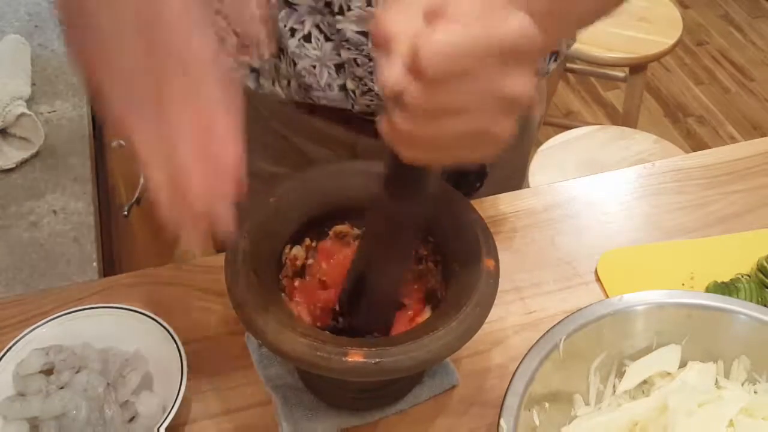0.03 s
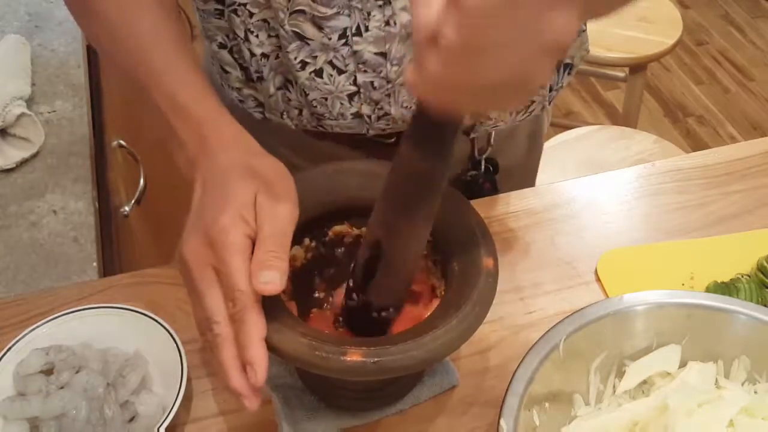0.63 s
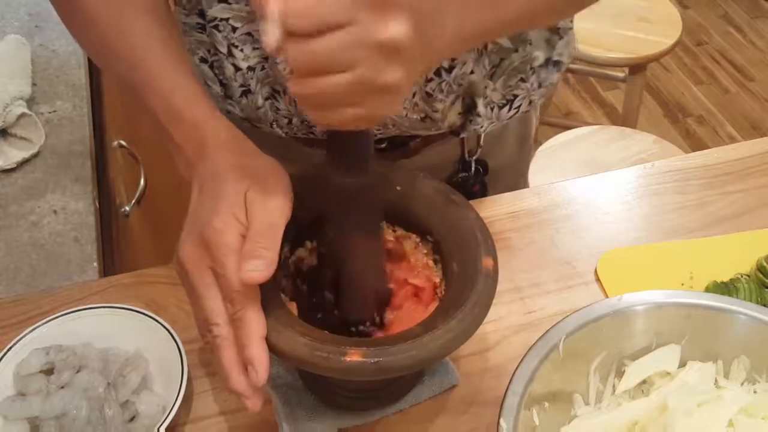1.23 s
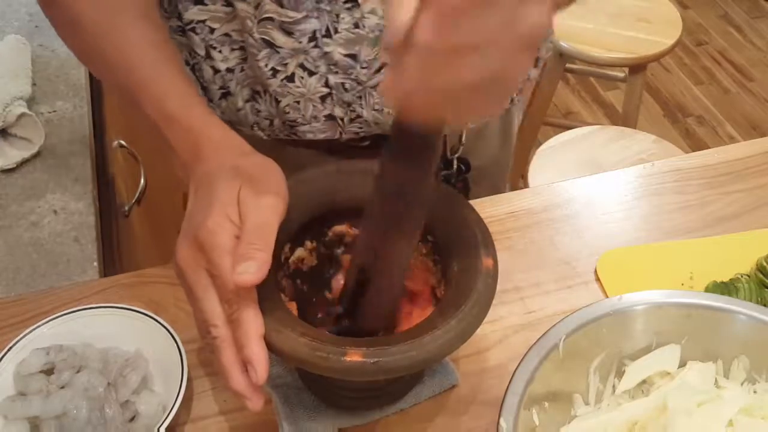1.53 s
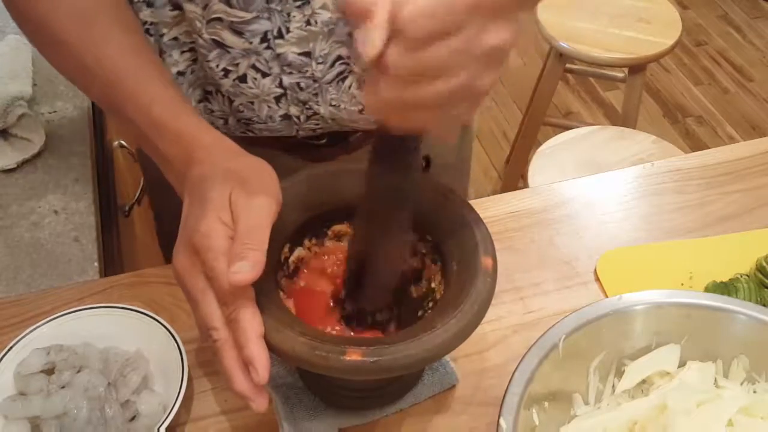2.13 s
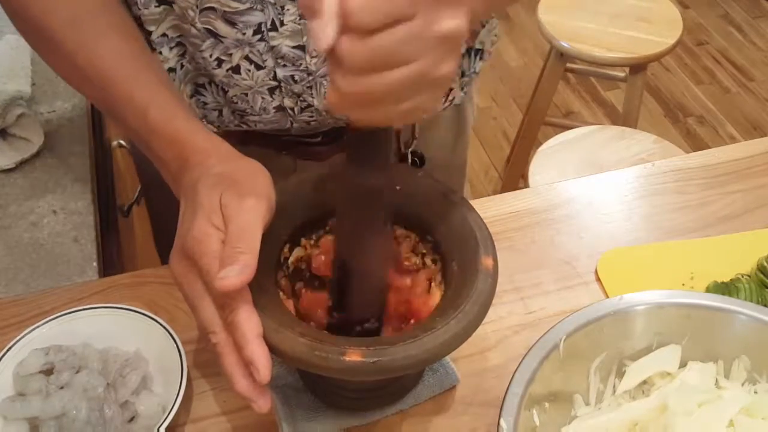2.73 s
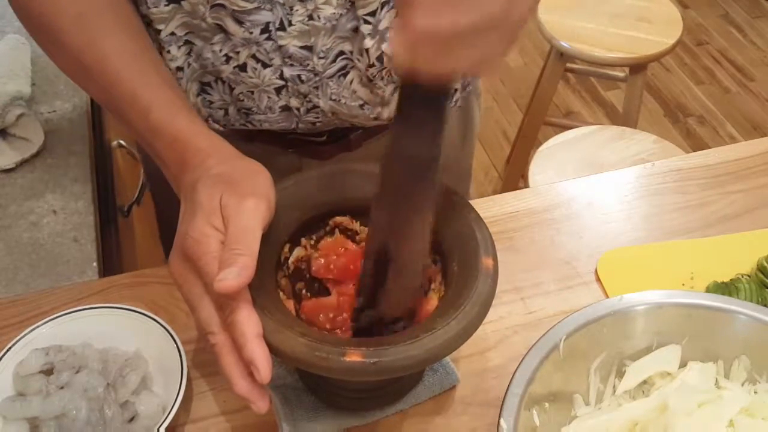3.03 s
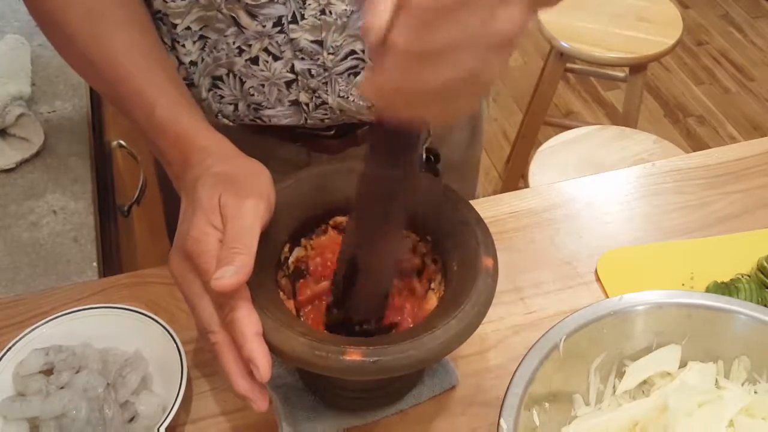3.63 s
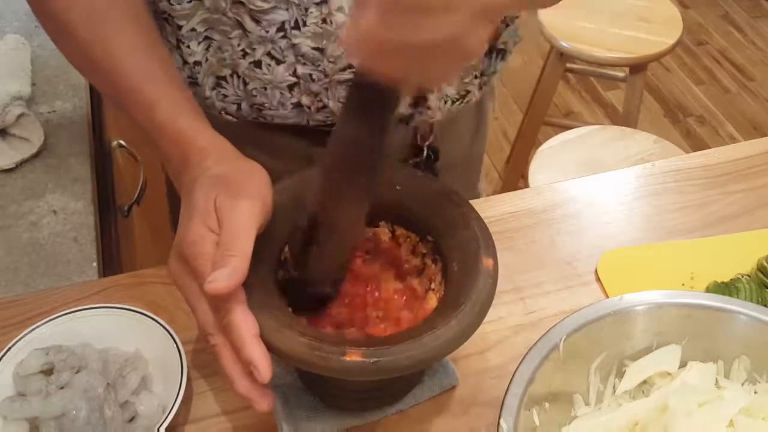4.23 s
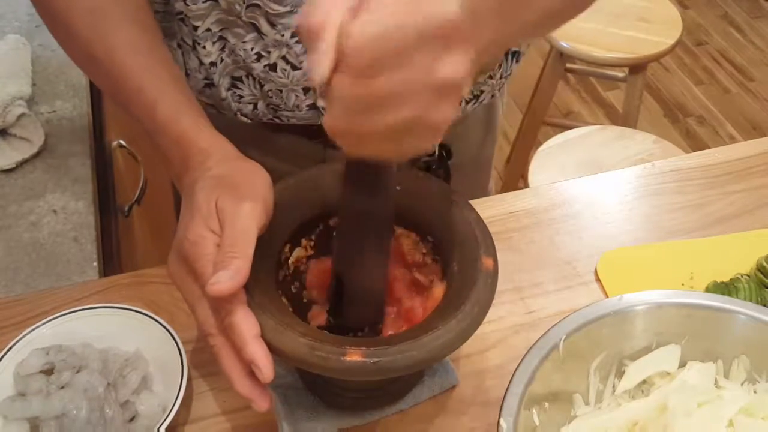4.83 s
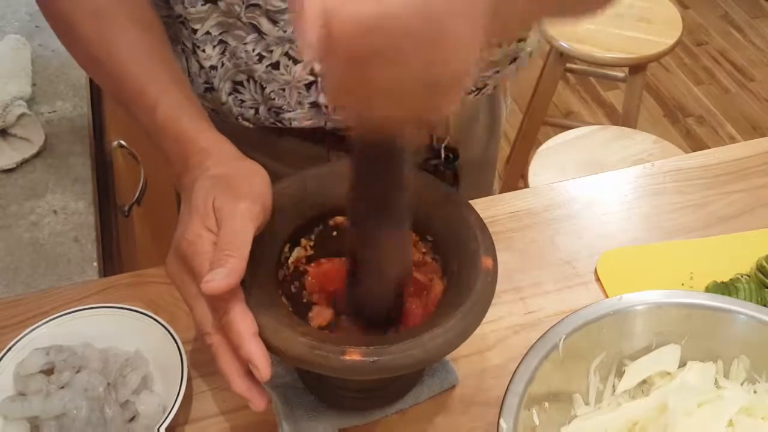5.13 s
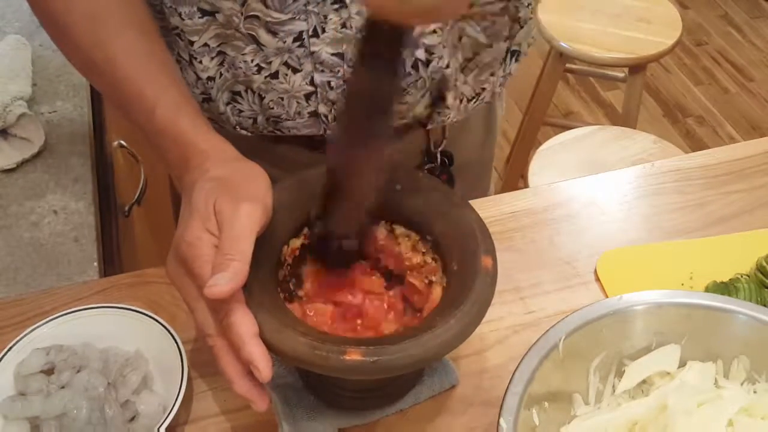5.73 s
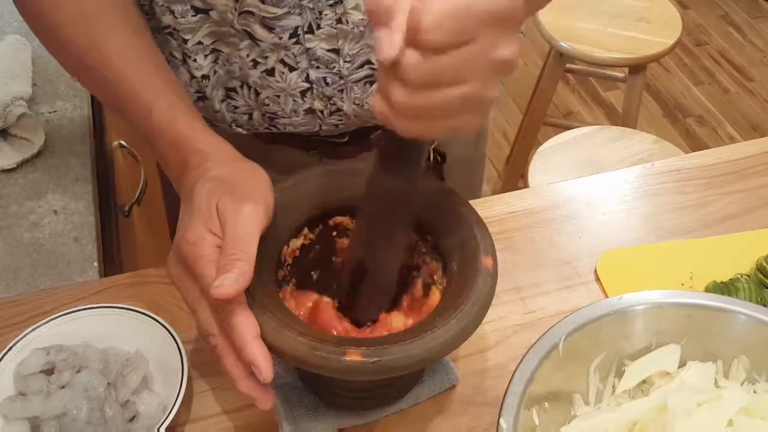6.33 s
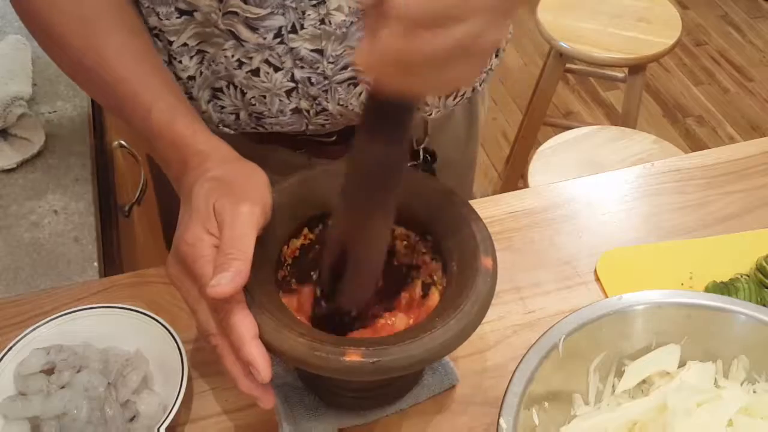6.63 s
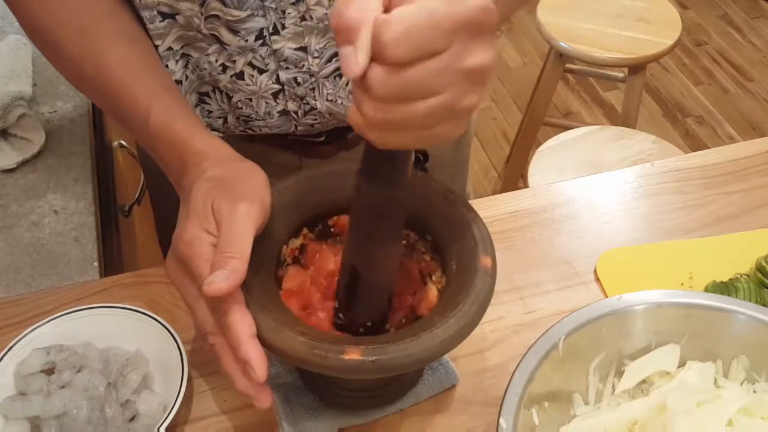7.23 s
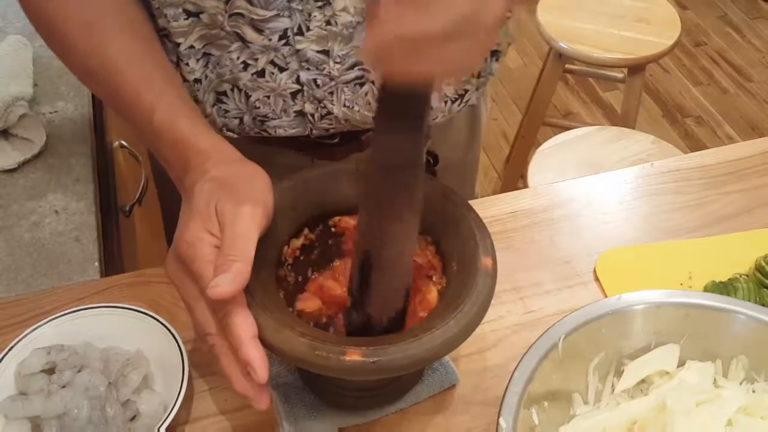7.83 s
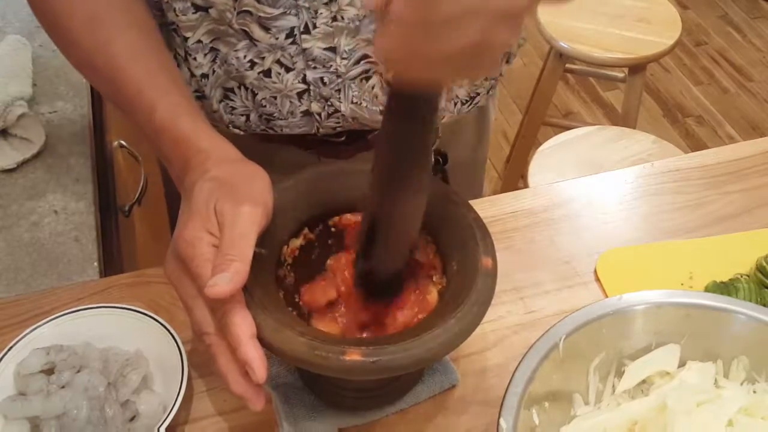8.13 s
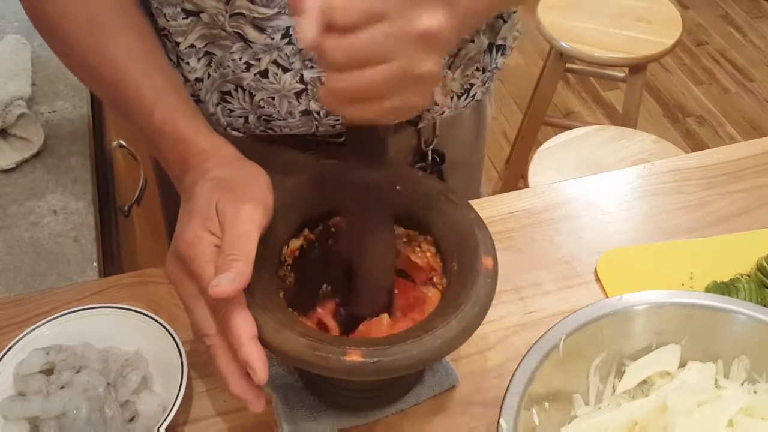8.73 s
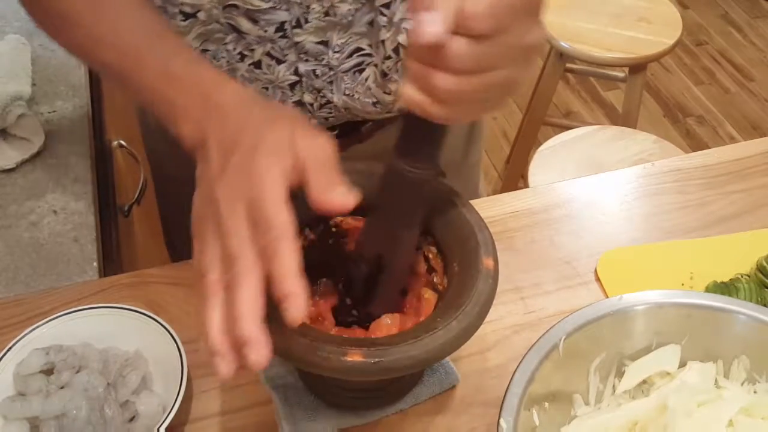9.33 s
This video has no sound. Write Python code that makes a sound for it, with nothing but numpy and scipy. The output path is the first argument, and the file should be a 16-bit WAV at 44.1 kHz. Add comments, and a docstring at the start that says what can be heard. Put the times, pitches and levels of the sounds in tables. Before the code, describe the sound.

A wooden pestle pounds wet tomato in a clay mortar, about two uneven strokes a second throughout. Each landing gives a hollow knock and a low thud through the counter, while the pulp squelches softly. Now and then the pestle clacks on the bare wall with a brief ring. The sound is close and slightly left, in a small kitchen with a faint appliance hum.

```python
"""A wooden pestle pounds wet tomato in a clay mortar on a kitchen counter, close to a stereo microphone.
Some strokes clack on the bare wall and set it ringing; each landing knocks the bowl's hollow and thuds
through the counter. The pulp squelches with trapped air and juice as the pestle enters and leaves.
The mortar stands a little left. The small room answers briefly, and an appliance hums behind it all."""
import sys
import numpy as np
from scipy import signal
from scipy.fft import rfft, irfft, next_fast_len
from scipy.io import wavfile

SR = 44100
rng = np.random.default_rng(int(sys.argv[2]) if len(sys.argv) > 2 else 0)


def int16_out(signal):
    """Quantize to a 16-bit WAV file."""
    q = np.round(np.clip(np.atleast_2d(signal).T, -1, 1) * 32767)
    wavfile.write(sys.argv[1], SR, q.astype(np.int16))


N = 418950
T = np.arange(SR // 2) / SR  # time within one blow
GRAIN_T = np.arange(SR // 6) / SR  # time within one squelch

# pestle on the bare wall: start_s, clack_db, contact_hz, ring_db, ping_db, counter_db
WALL_HITS = [(0.001, -35.5, 1010, -55.5, -60, -55), (0.868, -11, 1250, -39.5, -54.5, -37.5),
             (3.138, -19, 840, -49, -43, -53), (4.909, -18.5, 1050, -52, -52, -36.5),
             (5.882, -6.5, 1510, -27.5, -20.5, -40.5), (5.9646, -14.5, 1250, -56, -46, -35.5),
             (6.299, -9.5, 850, -31, -36, -42.5), (7.954, -11, 925, -38, -32.5, -42.5),
             (8.729, -16, 1115, -40, -49.5, -43)]
# pestle pressing through the pulp and landing: land_s, press_s, pulp_db, knock_db, bounce_db, counter_db
LANDINGS = [(0.002, 0.0018, -54, -41, -46.5, -49.5), (0.471, .04, -59, -41.5, -63, -71),
            (0.934, 0.06, -49, -25, -41.5, -38), (1.265, .005, -53, -44.5, -41.5, -43),
            (1.324, 0.037, -51, -25, -40, -49), (1.346, .02, -44, -26, -38.5, -34),
            (1.744, 0.043, -58, -20, -45, -34.5), (1.762, 0.017, -45.5, -19.5, -43, -45),
            (2.149, 0.077, -54.5, -45.5, -56.5, -65), (2.512, 0.08, -48.5, -30, -40.5, -40),
            (2.85, .04, -55, -47, -60, -64), (3.195, 0.0065, -57.5, -29.5, -45.5, -42),
            (3.236, .03, -55.5, -33.5, -36, -42), (3.262, 0.024, -55, -33, -45, -41.5),
            (3.827, 0.014, -48, -26.5, -42.5, -45.5), (4.138, 0.082, -61.5, -53, -55.5, -65),
            (4.378, .005, -86, -55, -41, -47), (4.46, 0.063, -51, -29.5, -43.5, -44),
            (4.934, 0.018, -46, -33.5, -46, -47), (4.981, 0.035, -50.5, -26, -45, -42),
            (5.492, 0.052, -55, -39.5, -44.5, -49), (6.008, 0.048, -52.5, -20, -39, -38),
            (6.02, 0.012, -52, -25, -67.5, -59), (6.413, 0.042, -46.5, -33.5, -46, -51),
            (6.448, 0.022, -47.5, -27.5, -49, -45.5), (6.843, 0.052, -59.5, -26.5, -40.5, -42.5),
            (7.29, .075, -53.5, -10.5, -39, -31.5), (7.679, .075, -50.5, -36, -40.5, -39.5),
            (8.045, .055, -44.5, -18, -37.5, -36.5), (8.46, .05, -68, -65, -79, -80),
            (8.779, .01, -53, -37, -47, -57), (8.84, 0.059, -51, -27, -48.5, -44),
            (9.19, 0.052, -57.5, -56, -42.5, -75.5), (9.464, 0.03, -56, -39, -50, -56)]


def amp(db):
    """dB to gain."""
    return 10 ** (np.asarray(db) / 20)


def unit(x):
    """Scale to rms 1."""
    return x / np.sqrt(np.mean(x ** 2) + 1e-20)


def unit_onset(x, seconds):
    """Scale to rms 1 over the first moments."""
    return x / np.sqrt(np.mean(x[:int(seconds * SR) + 1] ** 2) + 1e-20)


def unit_peak(x):
    """Scale to peak 1."""
    return x / (np.abs(x).max() + 1e-20)


def along(points, hz):
    """Read (frequency_hz, value) points on a log axis."""
    f, v = np.transpose(points)
    return np.interp(np.log(hz + 1), np.log(f), v)


def filtered(x, response):
    """Pass x through a complex frequency response."""
    n = x.shape[-1]
    m = next_fast_len(n + SR // 16, real=True)
    return irfft(rfft(x, m) * response(np.fft.rfftfreq(m, 1 / SR)), m)[..., :n]


def resonances(table, f):
    """Response of (pitch_hz, width_hz, level_db) resonances; neighbours swing in opposite senses."""
    return sum((-1) ** k * amp(db) * 1j * f * width / (hz * hz - f * f + 1j * f * width)
               for k, (hz, width, db) in enumerate(table))


def add(track, start_s, sound):
    """Mix a sound into the track."""
    start = max(round(start_s * SR), 0)
    track[start:start + len(sound)] += sound[:N - start]


def widen(pair, likeness):
    """Two unrelated noises become left and right with the given correlation."""
    turn = lambda f: np.arccos(np.clip(along(likeness, f), -1, 1)) / 2
    mid, side = filtered(pair, lambda f: np.array([np.cos(turn(f)), np.sin(turn(f))]))
    return np.array([mid + side, mid - side])


def background(air_db=-63, hum_db=-64.5):
    """Still room air and the narrow drones of an appliance."""
    air_spectrum = [(20, -21.5), (31, -29), (50, 0), (64, -4), (100, -2.5), (170, -8.5), (340, -5),
                    (500, -9.5), (1000, -13.5), (1900, -13), (2500, -20), (4000, -23), (8000, -28.5),
                    (15500, -34.5)]  # room tone: frequency_hz, density_db
    likeness = [(60, 0.63), (180, 0.99), (550, 0.66), (1650, 0.12), (4970, -0.18), (15000, 0.19)]  # left against right: frequency_hz, correlation
    drones = [(118, 7.5, -2.5), (321.3, 3.3, -1), (365.5, 48, -12), (430, 33, -19.5), (790, 6.8, -25),
              (1250, 43, -24)]  # appliance hum: pitch_hz, width_hz, level_db
    air, hum = (widen(rng.standard_normal((2, N)), likeness) for _ in range(2))
    air = unit(filtered(air, lambda f: amp(along(air_spectrum, f))))
    hum = unit(filtered(hum, lambda f: resonances(drones, f)))
    return amp(air_db) * air + amp(hum_db) * hum


def kitchen(x, gap_s=0.0029, build_s=0.02):
    """The room answers after a short gap; each frequency dies at its own speed."""
    decay = [(100, 0.32), (500, 0.28), (1400, 0.41), (4000, 0.48), (9000, 0.288), (15000, 0.6)]  # reverberation time: frequency_hz, t60_s
    tone = [(80, 6), (300, 9.5), (750, -0.5), (1400, -1), (3000, -1), (8000, 3), (15000, -5)]  # colour of the tail: frequency_hz, level_db
    likeness = [(100, 0.96), (400, 0.91), (1000, 0.056), (8000, 0)]  # left against right: frequency_hz, correlation
    hz, t, noise = signal.stft(rng.standard_normal((2, len(T))), SR, nperseg=256)
    fading = noise * amp(-60 * t / along(decay, hz)[:, None])
    tail = signal.istft(fading, SR, nperseg=256)[1][:, :len(T)]
    tail = filtered(widen(tail, likeness), lambda f: amp(along(tone, f)))
    tail *= np.clip((T - gap_s) / build_s, 0, 1)
    return signal.fftconvolve(x[None], tail / np.linalg.norm(tail[0]), axes=1)[:, :N]


def reflections(x, dull_hz=5000):
    """Close surfaces send back slightly dulled copies, at different times on each side."""
    echoes = [(.0014, 0.00062, -20.5), (.0025, 0.0041, -14.5), (.0056, .0052, -14), (.0086, 0.012, -11),
              (.0141, 0.017, -22), (.0212, 0.032, -16)]  # counter, dishes, cupboards, ceiling: left_delay_s, right_delay_s, level_db
    copies = lambda f: sum(amp(db) * np.exp(-2j * np.pi * f * np.array([[left], [right]]))
                           for left, right, db in echoes)
    return filtered(x, lambda f: copies(f) / (1 + (f / dull_hz) ** 2))


def from_left(x, lead_s=0.000055, max_radians=1.745):
    """The left side of the microphone hears the sound sooner and mostly louder."""
    balance = [(70, 9.5), (150, 0), (300, 3), (650, -0.5), (1400, 6), (2500, 1), (5000, -2.5), (10000, 3.5)]  # left over right: frequency_hz, level_db
    side = np.array([[1], [-1]]) / 2
    phase = lambda f: np.minimum(2 * np.pi * f * lead_s, max_radians)
    return filtered(x, lambda f: amp(side * along(balance, f)) * np.exp(1j * side * phase(f)))


def bubbles(pitch_hz, spread_s, count=9, cycles=26, glide=0.19, scatter=0.18):
    """Air pockets pop one after another: short damped tones whose pitch rises."""
    wait, detune, size = rng.standard_normal((count, 3)).T[:, :, None]
    hz = pitch_hz * np.exp(scatter * detune)
    delay = (np.abs(wait) - np.abs(wait).min()) * spread_s
    t = np.maximum(GRAIN_T[:SR // 14] - delay, 0)
    age = t * hz / cycles  # 1 when a pop has fallen by 60 dB
    pops = amp(1.7 * size - 60 * age) * np.sin(2 * np.pi * hz * t * (1 + glide * np.minimum(age, 1)))
    return (pops * np.exp(-delay / spread_s)).sum(0)


def settling(count=45, level_db=-70, uneven_db=4.5, pitch_hz=2500):
    """The wet paste slides down the wall with faint pops at random moments."""
    track = np.zeros(N)
    for place, (size, detune) in zip(rng.random(count), rng.standard_normal((count, 2))):
        pops = bubbles(pitch_hz * np.exp(0.22 * detune), spread_s=0.0061)
        add(track, place * (N - 1) / SR, amp(level_db + uneven_db * size) * unit_onset(pops, 0.0087))
    return track


def crackle(spread_db, colour, burst_samples=30):
    """Tiny noise bursts of unequal size in the given colour, rms 1."""
    n = len(GRAIN_T)
    sizes = np.repeat(np.minimum(rng.standard_normal(n), 2.4), burst_samples)[:n]
    return unit(filtered(rng.standard_normal(n) * amp(spread_db * sizes), colour))


def squelch(flow, pitch_hz, smack_db, spray_db, hollow_db):
    """Pulp moves with the given flow: air pockets smack, spray fizzes and the bowl's hollow answers."""
    fizz = [(2000, -37), (3500, 0.5), (5500, 0.5), (8500, 3), (10500, -6.5), (12500, -1.5), (15500, -10.5)]  # spectrum of the spraying juice: frequency_hz, density_db
    pockets = [(1500, 450, -5), (pitch_hz, 0.22 * pitch_hz, 2),
               (1.42 * pitch_hz, 600, -5), (2 * pitch_hz, 700, -11)]
    smack = crackle(spread_db=8, colour=lambda f: resonances(pockets, f) * f / np.hypot(f, 1200))
    spray = crackle(spread_db=8.5, colour=lambda f: amp(along(fizz, f)))
    hollow = crackle(spread_db=-1, colour=lambda f: resonances([(827, 240, 0)], f) ** 2)
    layers = [(smack_db, smack), (spray_db, spray), (hollow_db, hollow)]
    return np.sqrt(np.mean(flow ** 2)) * sum(amp(db) * unit(flow * grains) for db, grains in layers)


def squirts(burst_s=0.0055, ooze_db=-26, ooze_s=0.032):
    """Air and juice burst out, or are sucked in as the pestle lifts; bubbles pop and a little oozes."""
    bursts = [(0.078, -59, 2500, -80), (0.434, -63, 3500, -47.5), (0.471, -50, 2120, -73),
              (0.482, -49, 2100, -70), (0.742, -56.5, 1820, -81), (1.124, -45, 2080, -65),
              (1.325, -41.5, 1844, -47), (1.359, -37.5, 3120, -58.5), (1.653, -49, 1924, -62),
              (1.697, -56.5, 2780, -54), (2.149, -47.5, 2730, -72), (2.449, -54, 3880, -52.5),
              (2.495, -55, 2500, -54.5), (2.811, -62, 3200, -53.5), (2.844, -55, 3190, -68),
              (3.285, -51, 1970, -50), (3.826, -38, 2300, -48), (3.831, -41, 4600, -66),
              (4.373, -53.5, 2600, -55.5), (4.444, -51.5, 1890, -55), (4.656, -59.5, 2850, -69),
              (4.933, -39.5, 3150, -44.5), (4.97, -44.5, 2420, -48), (5.373, -61.5, 3070, -62),
              (5.963, -38, 3050, -72), (6.001, -46.5, 2700, -60), (6.43, -39.5, 2270, -36),
              (6.823, -44.5, 2430, -48), (6.972, -59, 1700, -81.5), (7.208, -61, 2920, -51.5),
              (7.25, -47.5, 2500, -55), (7.321, -50.5, 1930, -76.5), (7.606, -50, 1850, -55),
              (8.013, -48.5, 1950, -57.5), (8.046, -40.5, 2790, -55), (8.806, -68, 2300, -46.5),
              (9.146, -50.5, 2200, -44.5), (9.165, -40, 2420, -39.5), (9.426, -36.5, 2150, -49.5)]  # sudden squirts in the pulp: start_s, level_db, pocket_hz, spray_db
    track = np.zeros(N)
    flow = unit_onset(np.exp(-GRAIN_T / burst_s) + amp(ooze_db) * np.exp(-GRAIN_T / ooze_s), 0.01)
    for start_s, db, pitch_hz, spray_db in bursts:
        add(track, start_s, squelch(flow, pitch_hz, smack_db=db - 2, spray_db=spray_db, hollow_db=db - 4))
        add(track, start_s, amp(db - 3) * unit_onset(bubbles(pitch_hz, spread_s=0.007), 0.016))
    return track


def mashing(pocket_hz=2263, scatter=0.16, touch_s=0.0026, rise_db=15, release_s=0.018):
    """From first touch to landing the pulp is squeezed ever harder, with scattered pops, then rests."""
    track = np.zeros(N)
    for land_s, press_s, db, *_ in LANDINGS:
        pitch_hz = pocket_hz * np.exp(scatter * rng.standard_normal())
        swell = amp(rise_db * np.minimum(GRAIN_T / press_s - 1, 0)) * (1 - np.exp(-GRAIN_T / touch_s))
        flow = swell * np.exp(-np.maximum(GRAIN_T - press_s, 0) / release_s)
        squeeze = squelch(flow, pitch_hz, smack_db=db - 0.5, spray_db=db - 5, hollow_db=db - 1.5)
        pops = unit_onset(bubbles(pitch_hz, spread_s=0.025), 0.026)
        add(track, land_s - press_s, squeeze)
        add(track, land_s - press_s / 2, amp(db - 5) * pops)
    return track


def crushing(slope_s=0.012, below_knock_db=19, ceiling_db=-43):
    """Around each landing the flesh gives way in dull, uneven jerks."""
    track = np.zeros(N)
    dull = lambda f: resonances([(468, 260, -3), (790, 300, -0.5)], f) * resonances([(650, 900, 0)], f)
    for land_s, press_s, _, knock_db, _, _ in LANDINGS:
        flow = np.exp(-np.abs(GRAIN_T - press_s) / slope_s)
        jerks = crackle(spread_db=5, colour=dull)
        add(track, land_s - press_s, amp(min(knock_db - below_knock_db, ceiling_db)) * flow * jerks)
    return track


def ringing(modes, attack_s, scatter_db, scatter_cycles=0.13):
    """Modes swell and decay, at new strengths for each blow; neighbours start roughly opposed."""
    hz, db, t60 = np.transpose(modes)[:, :, None]
    level_db = db + scatter_db * rng.standard_normal(hz.shape)
    phase = np.arange(len(hz))[:, None] / 2 + scatter_cycles * rng.standard_normal(hz.shape)
    tones = amp(level_db - 60 * T / t60) * np.sin(2 * np.pi * (hz * T + phase))
    return tones.sum(0) * (1 - np.exp(-T / attack_s)) ** 2


def struck(table, contact_hz, low_hz):
    """One push into damped resonances; a soft contact holds less treble, a small bowl sheds no bass."""
    contact = signal.butter(3, min(contact_hz, SR / 3), fs=SR, output="sos")
    radiation = signal.butter(2, low_hz, "high", fs=SR, output="sos")
    push = signal.sosfilt(np.vstack([contact, radiation]), signal.unit_impulse(len(T)))
    return unit_peak(filtered(push, lambda f: resonances(table, f)))


def thuds(low_hz=50, glancing_db=-2):
    """Every blow bounces the mortar and shakes the counter, which radiates little below low_hz."""
    bounce_modes = [(62.7, -10, 0.32), (84, -10, 0.27), (104, -2.5, 0.15), (124.5, -2.5, 0.21)]  # the heavy mortar on its cloth: pitch_hz, level_db, t60_s
    counter_modes = [(183.7, -7.5, 0.29), (210.2, 1.5, 0.12), (253, -2.5, 0.1), (269, -9.5, 0.22),
                     (300.2, -9, 0.14), (348, -9, 0.1), (386.3, -9, 0.12), (436.4, -13, 0.17)]  # mortar and counter moving together: pitch_hz, level_db, t60_s
    track = np.zeros(N)
    # a glancing blow on the wall bounces the mortar less than it shakes the counter
    glancing = [(start_s, db + glancing_db, db) for start_s, *_, db in WALL_HITS]
    for start_s, *_, bounce_db, counter_db in [*glancing, *LANDINGS]:
        bounce = unit_onset(ringing(bounce_modes, attack_s=0.0097, scatter_db=0.5), 0.031)
        counter = unit_onset(ringing(counter_modes, attack_s=0.00097, scatter_db=3), 0.036)
        add(track, start_s, amp(bounce_db) * bounce + amp(counter_db) * counter)
    return signal.sosfilt(signal.butter(4, low_hz, "high", fs=SR, output="sos"), track)


def wall_ring():
    """After a hit on bare clay the mortar's rim swells into one note, damped by hand and pulp."""
    rim_modes = [(1422, -11, 0.19), (1437, -11, .17), (1640, -9.5, .05)]  # the clay rim: pitch_hz, level_db, t60_s
    track = np.zeros(N)
    for start_s, _, _, ring_db, _, _ in WALL_HITS:
        note = unit_onset(ringing(rim_modes, attack_s=0.014, scatter_db=3), 0.059)
        add(track, start_s, amp(ring_db) * note)
    return track


def wall_clacks(tick_db=-36, tick_t60_s=0.045):
    """Wood on bare clay: a tick, a short clack and a high ping."""
    clack_modes = [(565, 139, -3), (736, 150, 2), (964, 110, 1), (1142, 210, 3), (1431, 84, 10),
                   (1854, 140, 6.5), (2340, 380, -1), (3066, 190, 2.5)]  # damped resonances of the blow: pitch_hz, width_hz, level_db
    ping_modes = [(3480, -8, .012), (3633, 2.5, .021), (3703, -11, 0.06)]  # high modes of the clay wall: pitch_hz, level_db, t60_s
    track = np.zeros(N)
    for start_s, clack_db, contact_hz, _, ping_db, _ in WALL_HITS:
        clack = struck(clack_modes, contact_hz, low_hz=405)
        noise = unit(filtered(rng.standard_normal(len(T)), lambda f: resonances([(2900, 1700, 0)], f)))
        tick = amp(tick_db - 60 * T / tick_t60_s) * noise
        ping = unit_peak(ringing(ping_modes, attack_s=0.0005, scatter_db=0.5))
        add(track, start_s, amp(clack_db) * (clack + tick) + amp(ping_db) * ping)
    return track


def knocks(firm_db=-23.5, firm_hz=950, brighter_per_db=0.03):
    """Cushioned by pulp, the landing pestle sounds the bowl's hollow; harder knocks are brighter."""
    hollow_modes = [(597, 45.5, -8), (675, 77, -2.5), (776, 130, -1.5), (982, 110, -11), (1183, 216, -12)]  # the hollow of the bowl: pitch_hz, width_hz, level_db
    track = np.zeros(N)
    for land_s, _, _, knock_db, _, _ in LANDINGS:
        contact_hz = firm_hz * np.exp(brighter_per_db * (knock_db - firm_db))
        add(track, land_s - 0.001, amp(knock_db) * struck(hollow_modes, contact_hz, low_hz=512))
    return track


def scene():
    """Mortar, counter and pulp reach the microphone directly, off close surfaces and through the room."""
    clack, ring = wall_clacks(), wall_ring()
    knock = knocks() + crushing()
    thud = thuds()
    pulp = mashing() + squirts() + settling()
    shaded = filtered(clack, lambda f: 1 / (1 + (f / 3300) ** 4))  # the cupped hand shades the high ping
    sends = [(-7, shaded + amp(-3.5) * ring), (-7, knock), (-11.5, thud), (-10.5, pulp)]
    room = sum(amp(db) * kitchen(source) for db, source in sends)
    # the ring arrives off the kitchen walls, wide, with left and right out of step
    wide_ring = from_left(ring, lead_s=0.00019, max_radians=2.6)
    direct = from_left(clack + knock + thud + pulp)
    return direct + wide_ring + reflections(clack + knock + pulp) + room + background()


def record(dry, top_hz=15850):
    """The camera behind the microphone keeps nothing above its band limit."""
    return filtered(dry, lambda f: f < top_hz)


dry = scene()
out = record(dry)
int16_out(out)
```